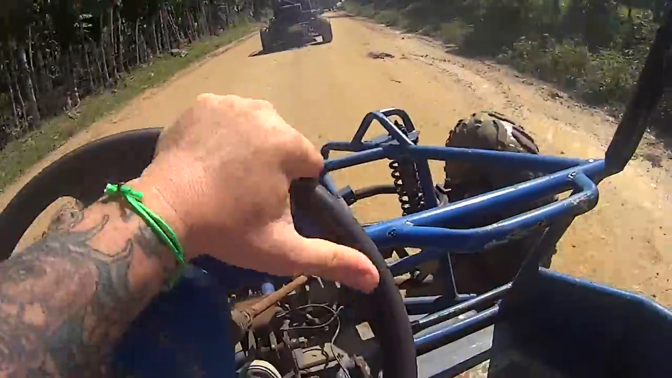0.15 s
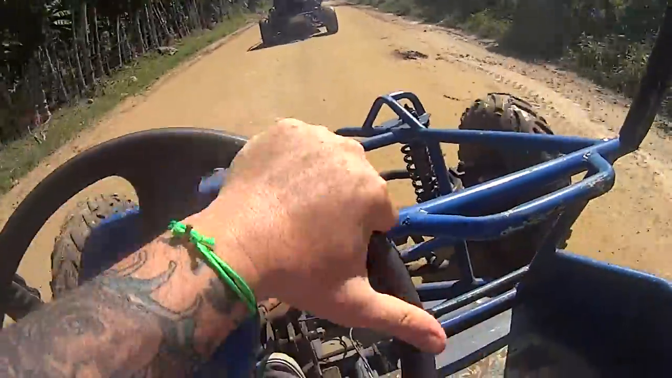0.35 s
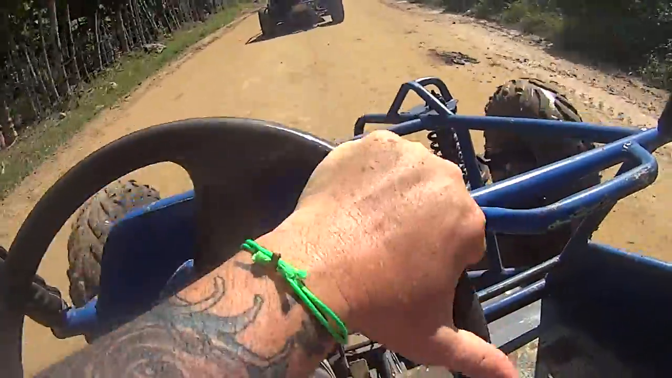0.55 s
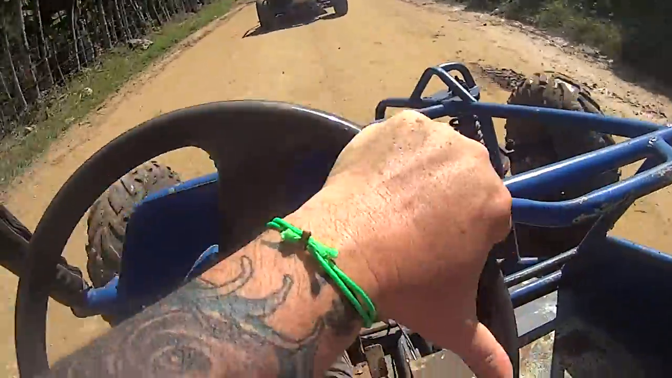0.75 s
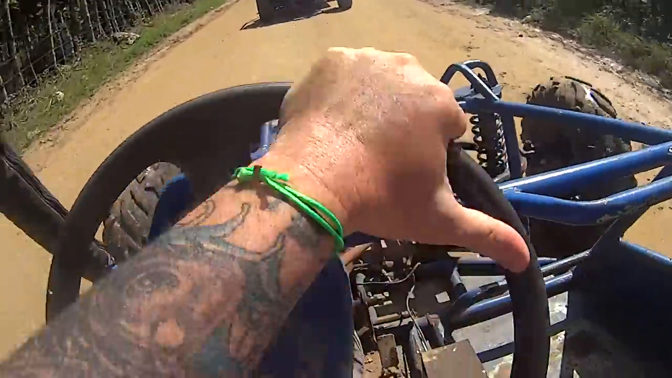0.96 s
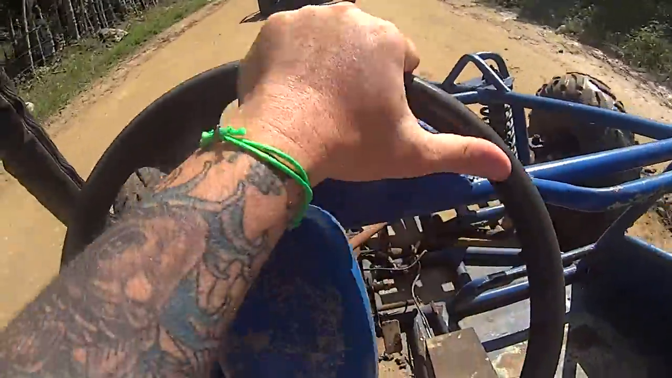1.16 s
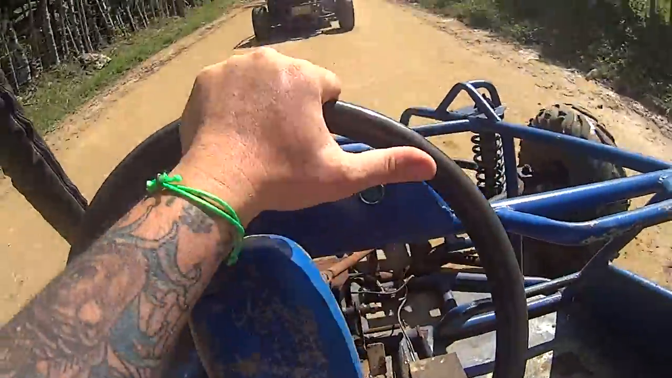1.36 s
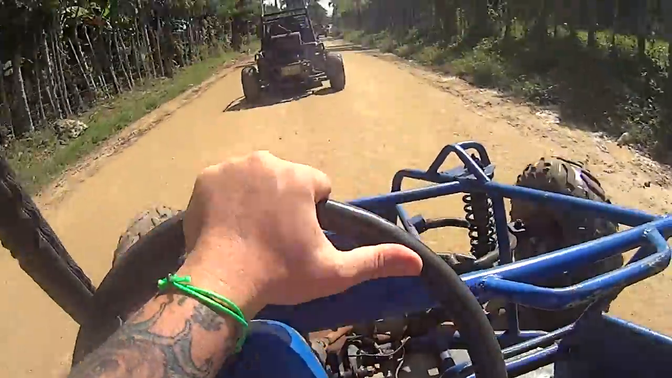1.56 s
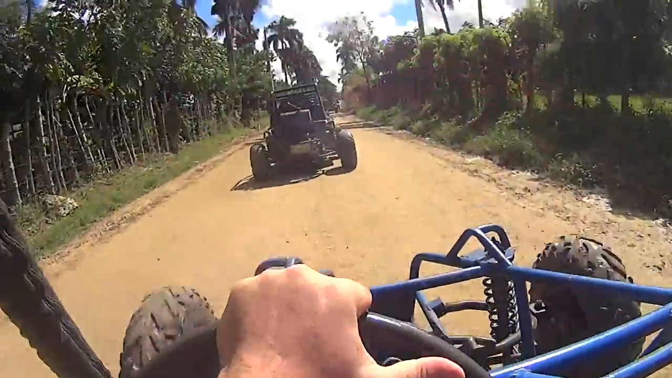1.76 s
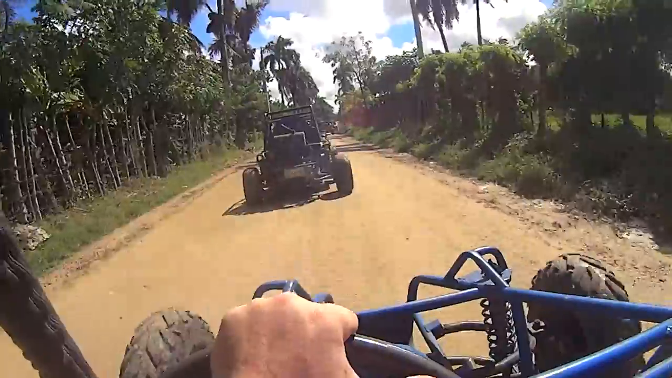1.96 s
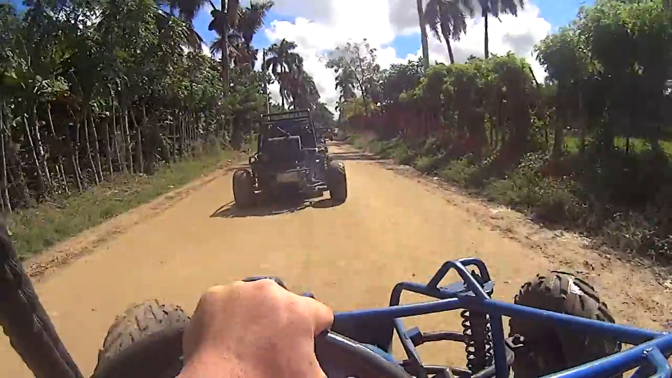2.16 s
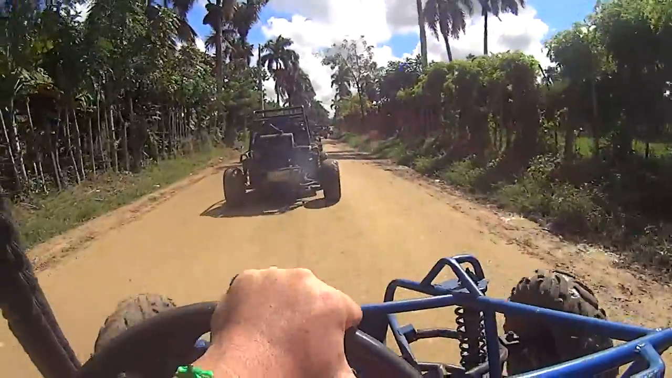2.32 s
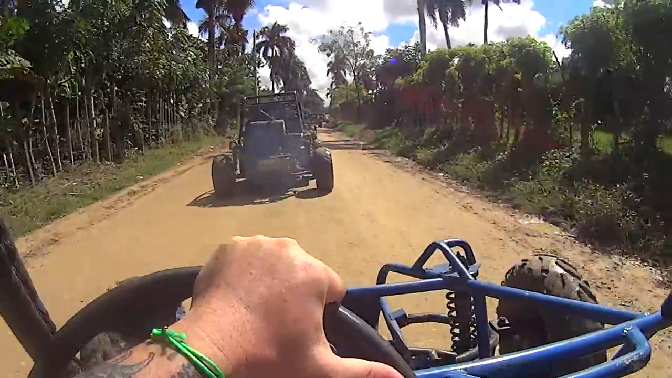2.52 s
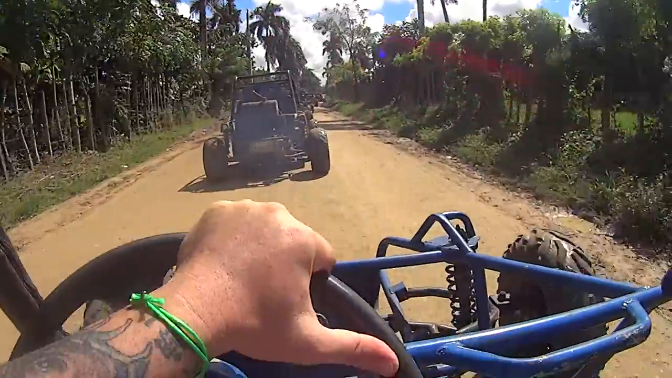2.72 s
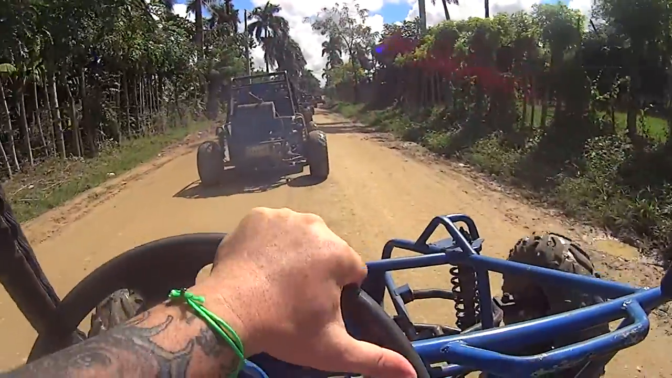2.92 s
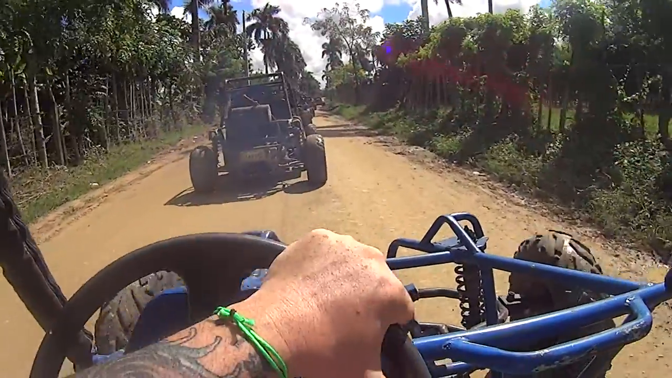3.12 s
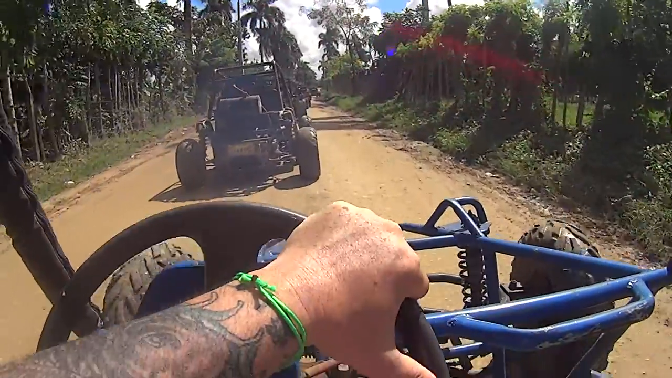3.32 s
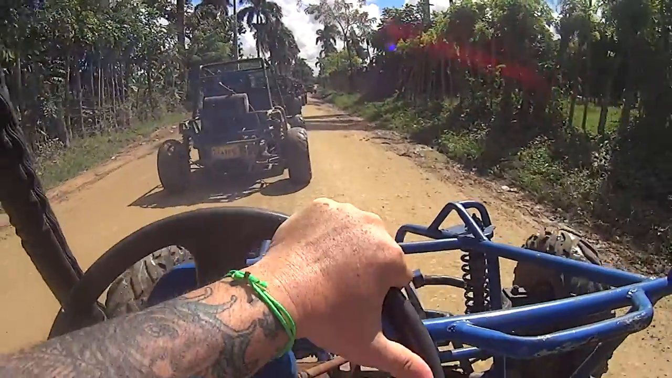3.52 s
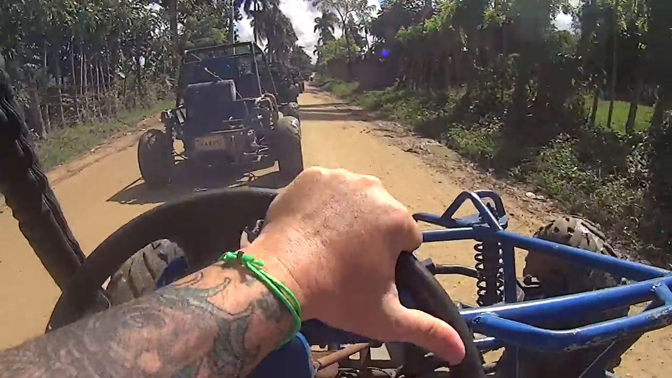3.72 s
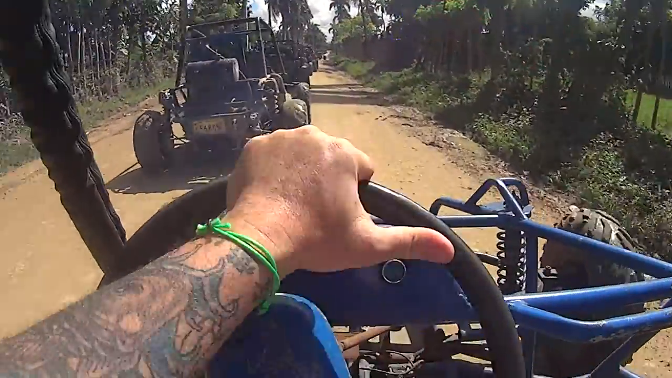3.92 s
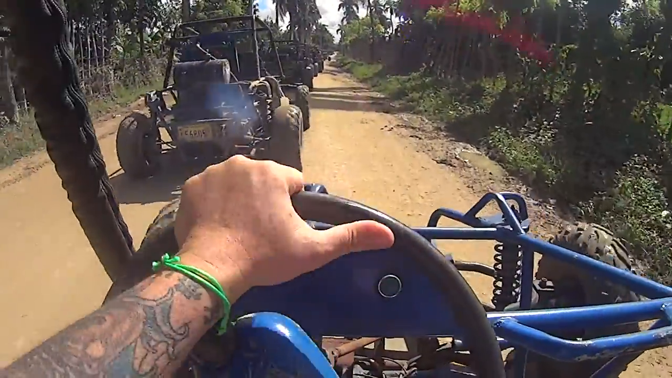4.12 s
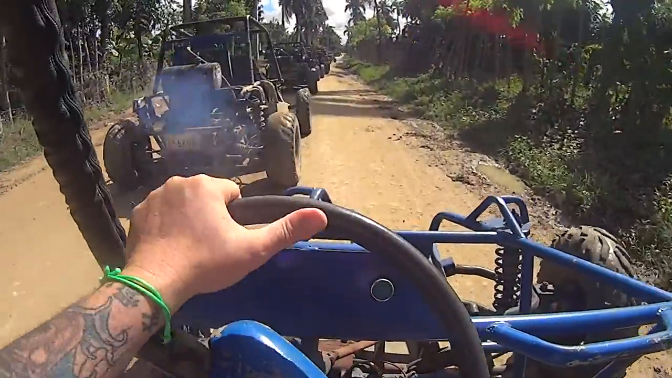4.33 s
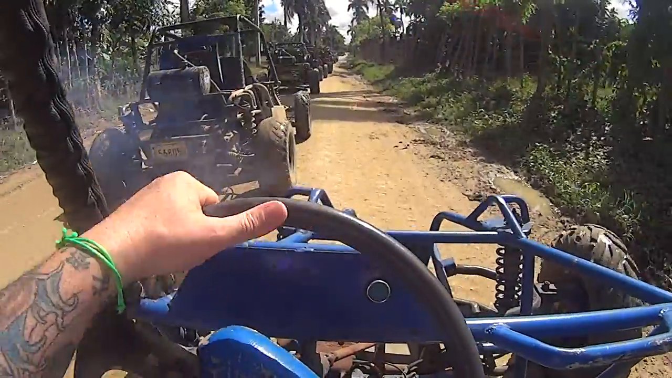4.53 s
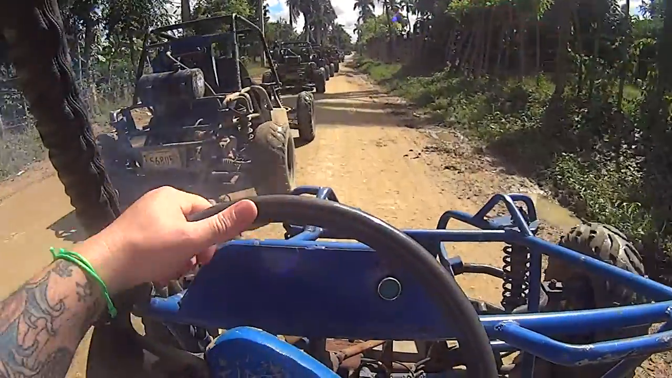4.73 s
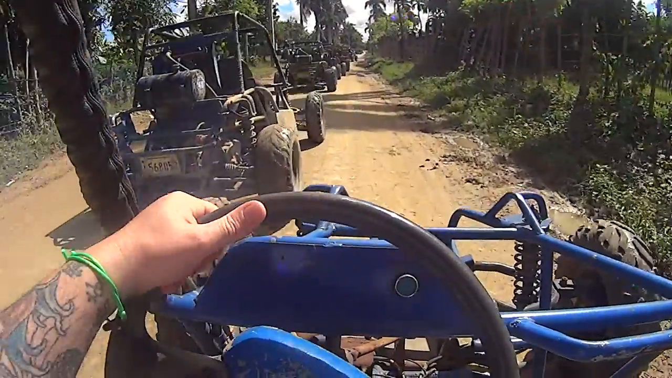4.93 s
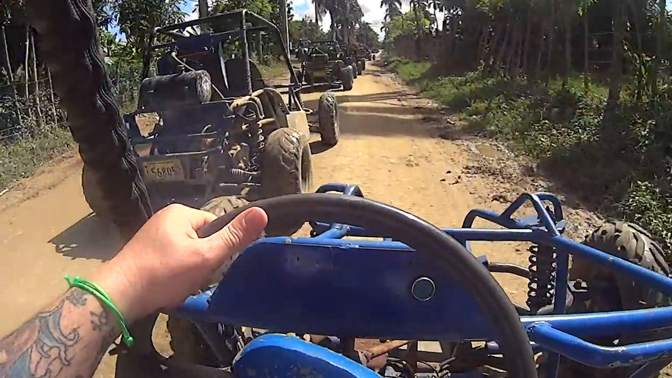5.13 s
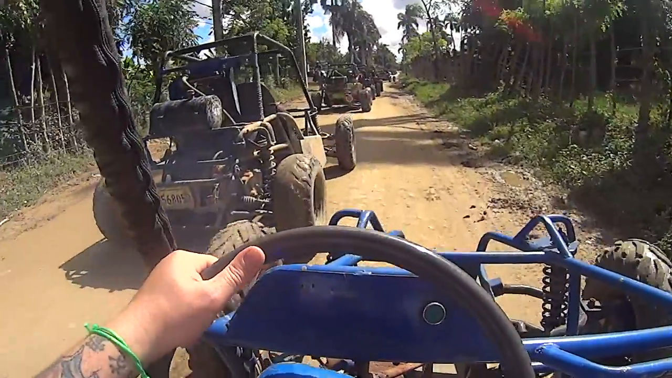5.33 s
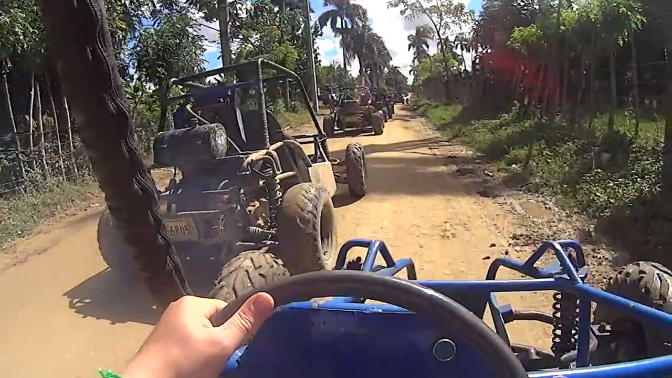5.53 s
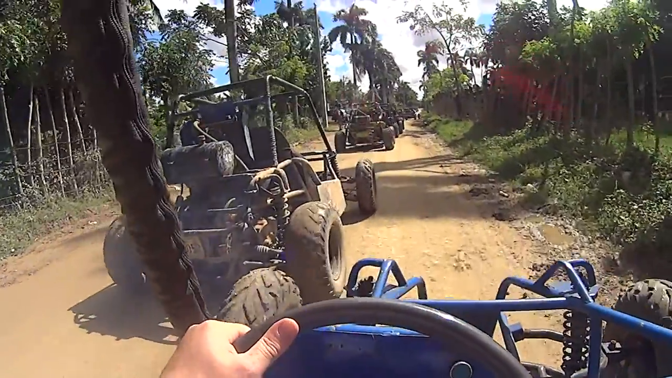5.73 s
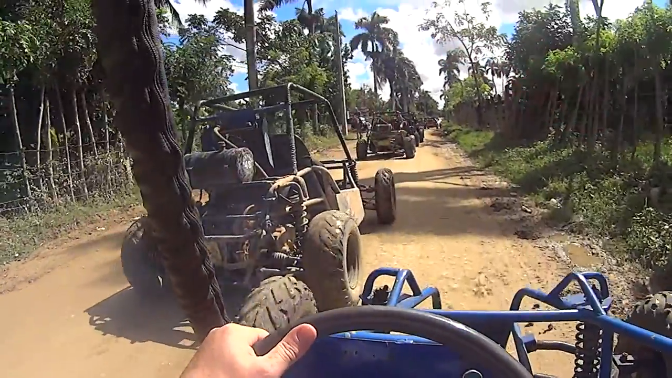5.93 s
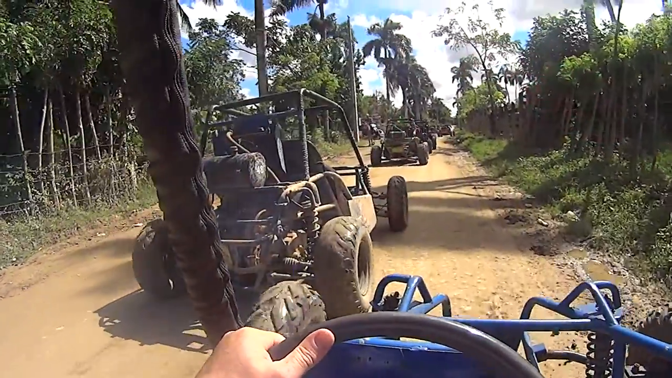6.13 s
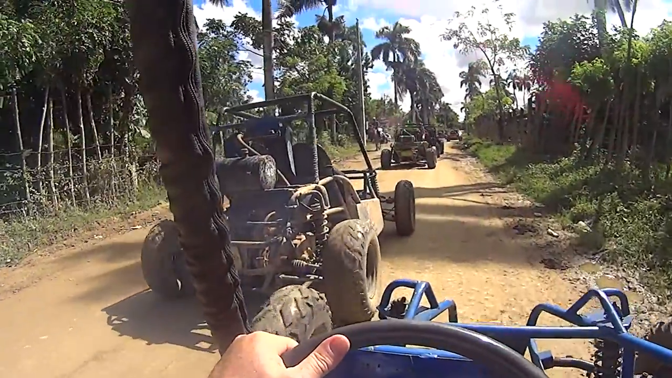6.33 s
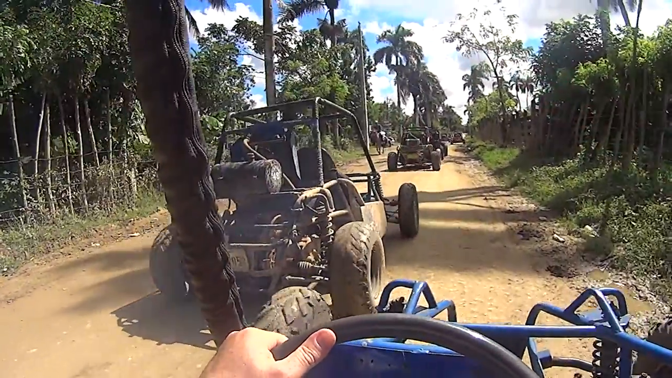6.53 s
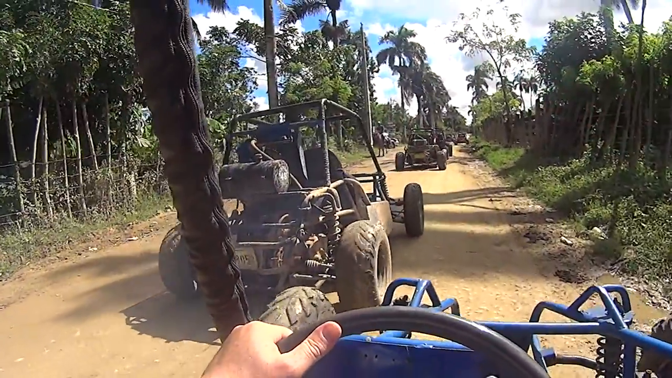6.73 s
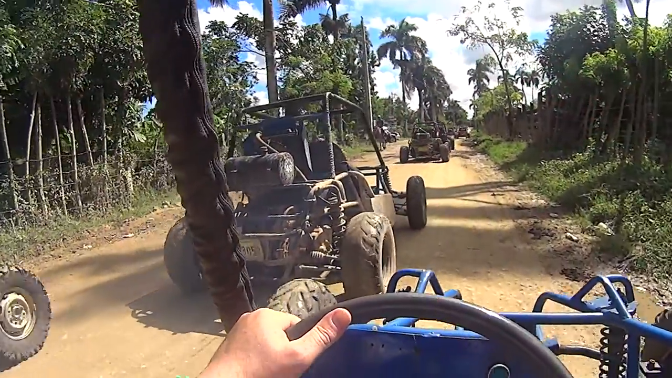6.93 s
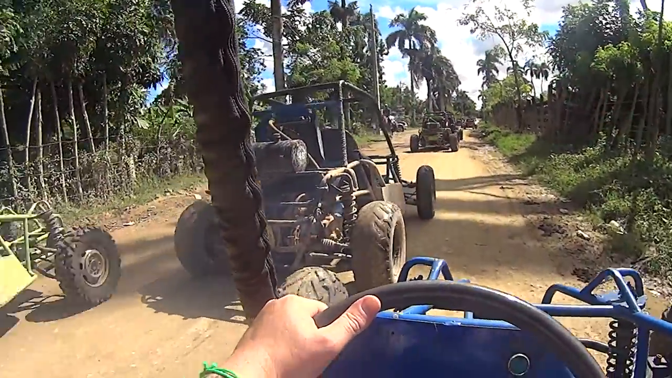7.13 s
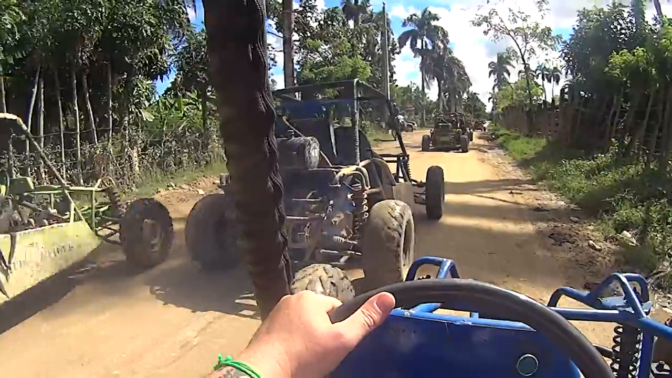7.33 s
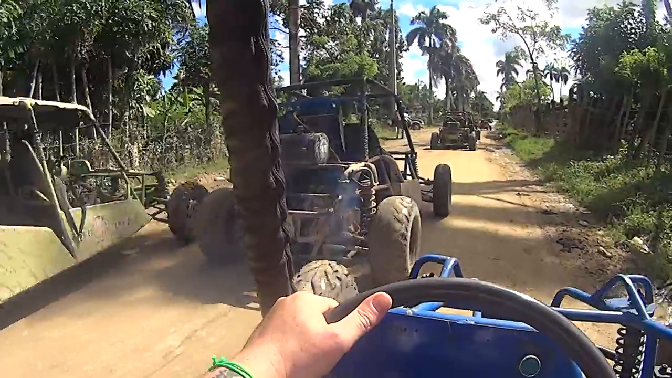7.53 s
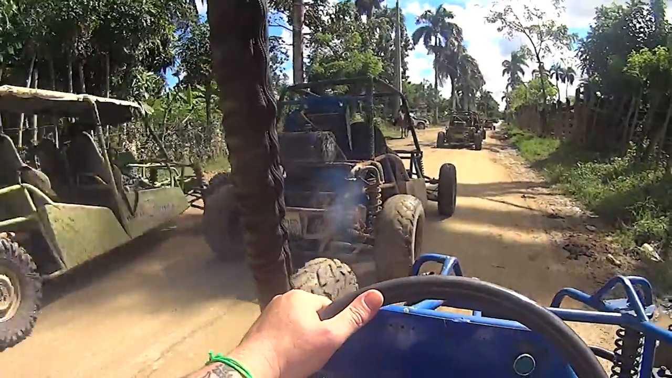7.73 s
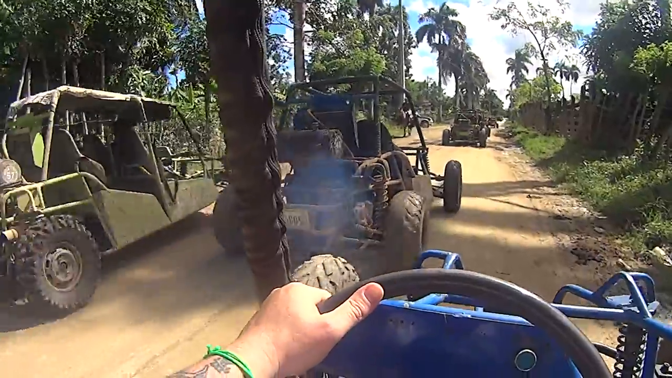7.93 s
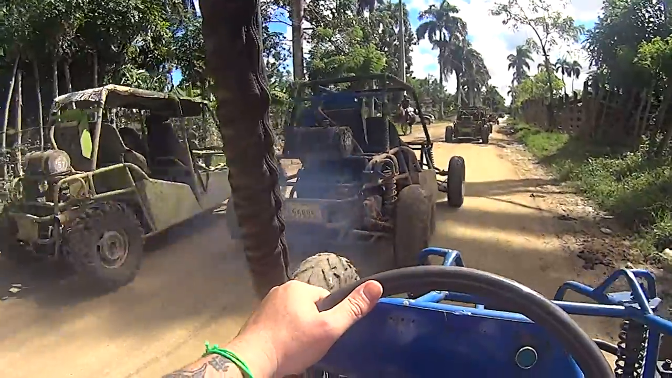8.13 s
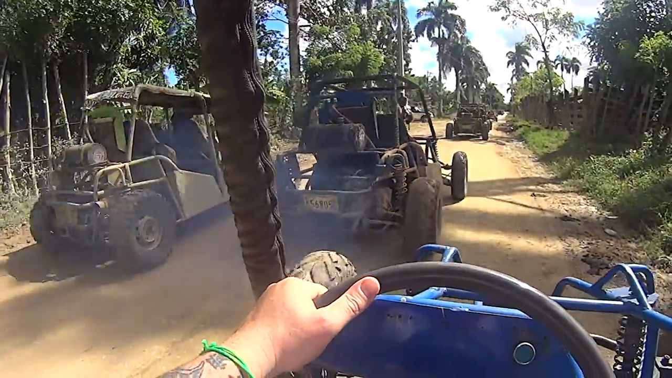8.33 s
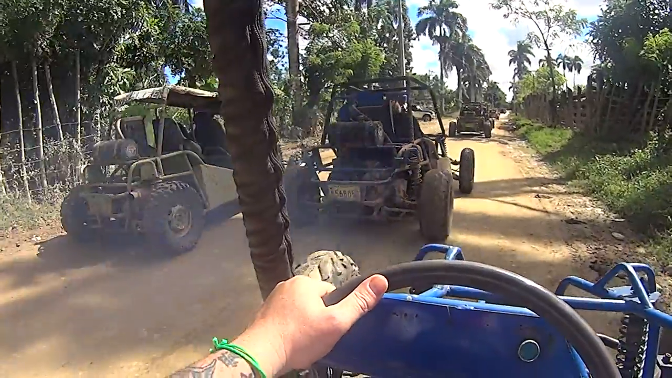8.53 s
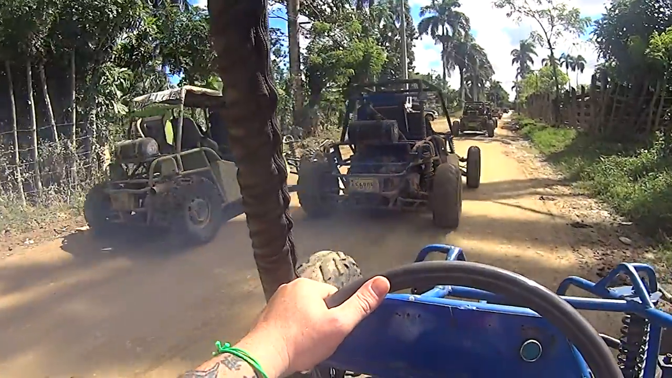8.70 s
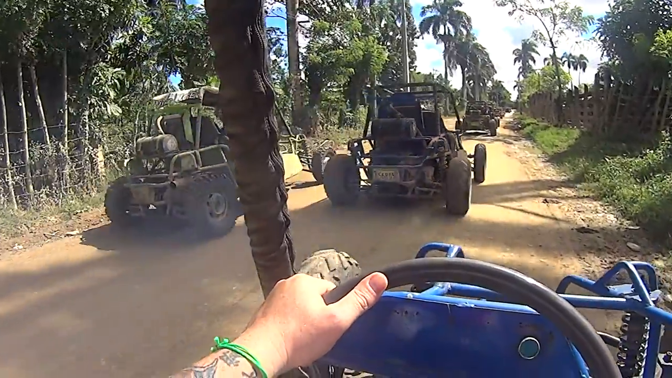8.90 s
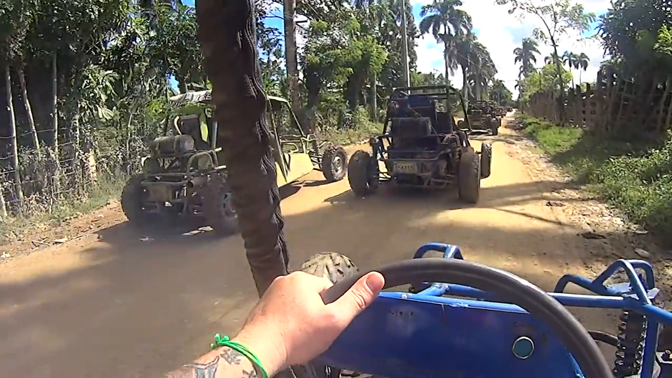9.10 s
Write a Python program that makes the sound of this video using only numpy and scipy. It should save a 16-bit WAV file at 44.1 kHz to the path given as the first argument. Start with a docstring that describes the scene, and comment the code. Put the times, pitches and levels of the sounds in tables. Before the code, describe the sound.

From the driver's seat of a dune buggy on a dirt track, the engine chugs at idle, then revs twice with a booming, raspy exhaust and sharp pops. It coasts down, revs hard twice more with a metallic buzz, and sinks to a quieter, uneven idle. Near the end, the buggy ahead pulls away, its engine rising in pitch amid a run of exhaust cracks.

```python
"""Dirt track, driver's seat of a dune buggy: each throttle press revs the engine, which then coasts down.
Firings boom in the silencer and sound the pipe; their blast barks, buzzes a heat shield and rings the
camera's plastic housing. A second buggy blips its throttle; the buggy ahead pulls away.
The frame rattles, the drive whines faintly, and a limiter holds down the loudest peaks."""
import sys
import numpy as np
from scipy import signal
from scipy.fft import rfft, irfft, next_fast_len
from scipy.io import wavfile
from scipy.ndimage import uniform_filter1d, minimum_filter1d, map_coordinates

SR = 44100
rng = np.random.default_rng(int(sys.argv[2]) if len(sys.argv) > 2 else 0)


def dump_mix(stems):
    """Bounce the given channels to the path in sys.argv[1] as a 16-bit WAV at rate SR."""
    frames = np.atleast_2d(stems).T  # one column per channel
    limited = np.clip(frames, -1, 1)  # hard clip at full scale
    pcm = np.round(limited * 32767).astype(np.int16)
    wavfile.write(sys.argv[1], SR, pcm)


N = 403956

IDLE_HZ, CLUTCH_HZ, CRUISE_HZ = 42.44, 70.07, 116.6  # firing rates
# Throttle presses: down/s, up/s, opening time/s, top firing rate/Hz, bow of climb (0 = straight),
# pipe boost/dB, bark/dB, ring/dB, rasp/dB, shield/dB, tick re rasp/dB,
# drone share, turbulent share, singing share of ring. Levels in all tables are relative.
PRESSES = [(1.106, 1.763, .08, 113, 0.39, 8.8, -28, -13.5, -30, -51.5, -20.5, 0.084, 0.075, 0.35),
           (1.999, 2.42, 0.038, 134.8, 0.21, 7, -31.5, -14, -29, -51, -16, 0.23, 0.25, 0.041),
           (3.98, 4.52, 0.14, 106.2, 0.29, 4.9, -23, -14, -26.5, -29.5, -7, 0.12, 0.11, 0.036),
           (4.74, 4.802, 0.027, 87.7, 0.016, 1.4, -27.5, -13, -33.5, -42, -16, 0.073, 0.64, 0.052),
           (4.86, 5.657, 0.027, 135.1, -.17, 1.48, -28.5, -14.5, -33, -57, -3, 0.15, 0.16, 0.38)]
# Bass, common to boom and pipe: t/s, level/dB
BASS = [(0, -38.5), (.55, -37.5), (1.98, -37.5), (2.2, -41.5), (2.8, -44), (3.15, -40.5), (3.55, -42),
        (4.1, -38.5), (5.15, -38), (5.45, -47), (6.6, -52), (7.6, -52), (8, -46)]
# Blast, throttle shut: t/s, level/dB
SHUT_BLAST = [(0, -49), (1, -45), (1.9, -42.5), (2.55, -40.5), (2.9, -47), (3.3, -42.5), (3.6, -50),
              (4, -42.5), (4.65, -38.5), (5.72, -42), (6.08, -47.5), (6.45, -48.5), (7.3, -54), (7.7, -52)]
# Bark, throttle shut: t/s, level/dB
SHUT_BARK = [(0, -45), (1, -46.5), (2.5, -42.5), (2.9, -51), (3.3, -41), (3.7, -48.5), (4.65, -40),
             (5.75, -39.5), (6.15, -48.5), (7.3, -58), (7.7, -53.5)]
# Heat shield, throttle shut: t/s, level/dB
SHUT_SHIELD = [(0, -64), (1.9, -51), (2.45, -44.5), (3.3, -50), (3.9, -57), (4.6, -47), (5.7, -60),
               (7.3, -68)]


def engine(tuned_hz=80.8, tuned_width_hz=17, tuned_peak_db=5):
    """Own engine: louder and cleaner with the throttle open, chugging unevenly with it shut."""
    rate, opened = firing_rate(), throttle_openings()
    throttle = np.minimum(opened.sum(0), 1)
    shut = 1 - throttle
    settings = np.transpose(PRESSES)[5:] @ opened
    boost_db, bark_db, ring_db, rasp_db, shield_db, tick_db, drone, rough, singing = settings
    bass_db, = curves(BASS)
    tuned_db = tuned_peak_db * np.exp(-((rate - tuned_hz) / tuned_width_hz) ** 2)  # pipe resonance
    pipe_db = bass_db + boost_db + throttle * tuned_db - .5 * shut
    rough = np.clip(rough + shut * np.interp(rate, [IDLE_HZ, CRUISE_HZ], [.95, .45]), .01, .99)
    drone = np.clip(drone + .049 * shut, 0, .8)
    idling = shut * np.interp(rate, [IDLE_HZ, CLUTCH_HZ], [1, 0])
    chug = -idling * np.cos(2 * np.pi * np.cumsum(rate / 3) / SR)  # one swell per engine cycle
    low = exhaust(rate, shut, chug, rough, drone, bass_db, pipe_db)

    pulsed = .89 * throttle + shut * np.interp(rate, [IDLE_HZ, CRUISE_HZ], [.22, .6])
    singing = np.clip(singing + .18 * shut, 0, 1)
    overrun_db = curves(SHUT_BLAST)[0] + .9 * wobble(14)  # uneven burning
    rev_octaves = throttle * np.log2(rate / CRUISE_HZ)
    bark_db += 10 * rev_octaves + throttle * .55 * (bass_db + 41) + shut * curves(SHUT_BARK)[0]
    ring_db += 4 * rev_octaves + shut * (overrun_db + 18.5) + .5 * chug
    rasp_db += 4 * rev_octaves + shut * (overrun_db - .86)
    shield_db += shut * curves(SHUT_SHIELD)[0] + 3.5 * wobble(36.46)  # buzzes in fits
    return low + rasp(rate, pulsed, singing, bark_db, ring_db, rasp_db, shield_db, tick_db)


def firing_rate(coast_hz_per_s=63, free_hz_per_s=130):
    """Rate/Hz: climbs on each press, coasts until the clutch lets go, drops to a wandering idle."""
    t = np.arange(N) / SR
    idle = IDLE_HZ * (1 + .035 * wobble(5))
    rate = idle
    for down, up, _, top, bow, *_ in PRESSES:
        start = rate[int(down * SR)]
        progress = np.clip((t - down) / (up - down), 0, 1)
        climb = start + (top - start) * (progress + bow * progress * (1 - progress))
        coast = top - coast_hz_per_s * (t - up)
        free = CLUTCH_HZ - (CLUTCH_HZ - coast) * free_hz_per_s / coast_hz_per_s
        fall = np.maximum(np.minimum(coast, free), idle)
        rate = np.select([t < down, t < up], [rate, climb], fall)
    return rate


def throttle_openings(close_s=.038):
    """Opening (0-1), one row per press: ramps open, springs shut."""
    t = np.arange(N) / SR
    return np.array([np.clip(np.minimum((t - down) / open_s, 1 - (t - up) / close_s), 0, 1)
                     for down, up, open_s, *_ in PRESSES])


# Header travel time per cylinder: delay/s
HEADER_S = [0.00025, 0.00055, 0]


def firings(rate, scatter_db, jitter, limp_db):
    """One impulse per firing; of three cylinders one is strong, one weak. Less even at low revs."""
    at = np.flatnonzero(np.diff(np.floor(np.cumsum(rate) / SR + .9)))
    chance = rng.standard_normal((len(at), 2))
    uneven = np.sqrt(70 / rate[at])
    cylinder_db = np.resize([1, 0, -1], len(at)) * np.broadcast_to(limp_db, N)[at]
    delay_s = np.resize(HEADER_S, len(at)) + jitter / rate[at] * uneven * chance[:, 0]
    arrival = np.clip(at + delay_s * SR, 0, N - 1).astype(int)
    return np.bincount(arrival, amp(uneven * (scatter_db * chance[:, 1] + cylinder_db)), N)


# Silencer, pipe and rumble spectra: f/Hz, level/dB
BOOM = [(25, -37), (48, -36), (64, -14.5), (80, -1), (125, -13.5), (160, -19), (260, -29.5), (500, -87.5)]
PIPE = [(60, -56), (120, -12), (165, 1), (250, -4), (330, 4), (410, 4), (500, -7), (640, -10.5),
        (900, -36.5), (1500, -65)]
RUMBLE = [(25, -27), (55, -10.5), (90, -13.5), (180, 2), (320, 4), (420, -7), (520, -9), (750, -15),
          (1200, -31), (2500, -87)]


def exhaust(rate, shut, chug, rough, drone_share, boom_db, pipe_db):
    """Firings boom in the silencer and sound the pipe; off throttle they break up into rumble."""
    pulses = firings(rate, scatter_db=.8, jitter=.003, limp_db=1.2 + 4 * shut)
    boom_pulses = firings(rate, scatter_db=0, jitter=.006, limp_db=1.5)
    boom = steady(voice(boom_pulses, BOOM) + 1.2 * np.sqrt(rough) * voice(noise(), BOOM))
    ragged = firings(rate, scatter_db=1, jitter=.032, limp_db=-1)
    rumble, rumble_side = [voice(puffs(ragged, decay_s=.04) * amp(3.5 * chug), RUMBLE) for _ in range(2)]
    pipe = blend(voice(pulses, PIPE), rumble, rough)
    cycles = np.cumsum(rate) / SR + .9 - np.mean(HEADER_S) * rate
    drone = np.sqrt(2) * np.sin(2 * np.pi * 3 * cycles + .2 * wobble(25))  # third harmonic
    pipe = blend(pipe, drone, drone_share)
    diffuse = amp(pipe_db - 8) * np.sqrt(rough) * rumble_side + amp(boom_db - 14) * voice(noise(), BOOM)
    return low_pair(amp(boom_db) * boom + amp(pipe_db + 1.5) * pipe) + pair(0, diffuse)


def blast(pulses, pulsed, crack, decay_s):
    """Gas leaving the pipe: a crack and puff per firing as the pulsed share, the rest a fluttering rush."""
    rush = noise() * amp(wobble(70))
    return blend(rush, steady(crack * pulses + puffs(pulses, decay_s)), pulsed)


# Bark, mid rasp and side rasp spectra: f/Hz, level/dB
BARK = [(400, -41.5), (620, -9.5), (740, -1), (820, 4), (910, 4.5), (1000, 5.5), (1130, 4.5), (1200, 7),
        (1260, 7.5), (1340, 9.5), (1700, -52.5)]
RASP = [(1400, -11.5), (2000, 7), (2700, -2), (3700, -9), (4500, -24), (6000, -6.5), (6800, -17.5),
        (8500, -32), (10300, -17), (11300, -40.5), (12000, -48.5)]
RASP_SIDE = [(600, -9), (1200, -5), (1750, 5), (2050, -15), (2350, 9.5), (2600, 4), (2900, 8), (3400, 3.5),
             (3750, -1.5), (4200, -4), (5500, -9.5), (6400, -19), (7500, -17), (10300, -21), (11800, -75)]
# Tailpipe and tick resonances: f/Hz, width/Hz, level/dB
TAILPIPE_MODES = [(915, 52, 4)]
TICK_MODES = [(5250, 374, 0.5), (6560, 300, -26), (7840, 190, -8.5), (9500, 510, -19.5)]
# Housing resonances (main, upper, singing, lowest): f/Hz, width/Hz, level/dB
HOUSING_MODES = [(1550.5, 72, 2.5), (1646.4, 37.4, 2.5), (1765, 88, -4.5), (1980, 140, -17.5),
                 (2339, 89, -21)]
UPPER_MODES = [(2367, 48, 8), (3356, 460, -0.5), (4200, 380, -4), (5220, 350, 3), (7670, 740, -9),
               (9130, 480, -12)]
SINGING_MODE = [(1590, 58, 0)]
LOW_MODE = [(1485, 50, 0)]
# Pitch sag of the ring before the first rev: t/s, share of LOW_MODE
RING_SAG = [(.55, 0), (.8, .5), (1.08, .6), (1.15, 0)]


def rasp(rate, pulsed, singing, bark_db, ring_db, rasp_db, shield_db, tick_db):
    """The exhaust blast barks, rings the housing walls and buzzes a heat shield."""
    pulses = firings(rate, scatter_db=1.6, jitter=.004, limp_db=1.6)
    bark = voice(blast(pulses, pulsed, crack=1.9, decay_s=.005), BARK, TAILPIPE_MODES)
    strike = blast(pulses, pulsed, crack=1.7, decay_s=.0035)
    sag, = curves(RING_SAG)
    shares = [((1 - singing) * (1 - sag), HOUSING_MODES), (singing, SINGING_MODE), (sag, LOW_MODE)]
    ring = steady(sum(share * voice(strike, modes=modes) for share, modes in shares))
    push_db = .5 * np.maximum(ring_db + 22, 0)  # full throttle drives the ring hardest
    hiss = blast(pulses, .82 * pulsed, crack=.25, decay_s=.0033)
    mid = voice(hiss, RASP, UPPER_MODES)
    # rocking walls drive left and right in opposition
    rocking = blast(pulses, .85 * pulsed, crack=.3, decay_s=.0022)
    side = voice(hiss + .57 * rocking, RASP_SIDE)
    shield = amp(shield_db) * voice(hiss, modes=[(3305, 222, 0), (3447, 99, 0)])
    tick_gate = np.clip((rasp_db + 42) / 8, 0, 1)  # firings tick when the rasp is loud
    tick = amp(rasp_db + tick_db) * tick_gate * voice(puffs(pulses, decay_s=.0012), modes=TICK_MODES)
    body = tick + shield + amp(bark_db - .5) * bark + amp(ring_db + push_db) * ring
    return pair(body + amp(rasp_db + 2) * mid, amp(rasp_db + 7.5) * side)


# Exhaust pops: t/s, level/dB
POPS = [(1.068, -8), (1.145, 3), (1.152, -13), (1.208, 0), (1.305, -4.5), (1.388, 1.5), (2.025, -3.5),
        (2.507, -10), (3.116, -17), (3.257, -9), (4.758, -7), (4.867, -4), (7.763, -5), (7.795, -10),
        (7.845, -10), (7.912, -6), (7.954, 0.5), (8.028, 0), (8.061, -10), (8.143, -12), (8.177, -1),
        (8.223, -9.5), (8.452, 0), (8.673, -1), (8.716, 3), (9.013, -3.5)]


def pops():
    """Single hard firings strike the housing."""
    impulses = blows(POPS)
    burst = impulses + .35 * puffs(impulses, decay_s=.003)
    ring = amp(31) * colour(burst, modes=HOUSING_MODES)
    return ring + amp(2) * colour(puffs(impulses, decay_s=.008), RASP, UPPER_MODES)


# Revs of the buggy ahead: t/s, firing rate/Hz
AHEAD_RATE = [(7.73, 30), (7.85, 42.5), (8.04, 58), (8.15, 61.5), (8.35, 66.5), (8.6, 68.5), (8.8, 70.3),
              (9, 72.5), (9.16, 75)]
# Its pipe, bark, ring and rasp: level/dB, slope/(dB per octave of firing rate)
AHEAD_LEVELS = [(-33, 21), (-33.5, 13), (-16.5, 5), (-30, 2)]
# Its pipe spectrum: f/Hz, level/dB
AHEAD_PIPE = [(55, -52.5), (75, -3.5), (135, 1.5), (210, 0.5), (280, -2.5), (360, 4.5), (440, 1.5),
              (510, -0.5), (580, -28), (660, -28), (770, -9.5), (900, -15), (1500, -56)]
# Housing resonances, struck from the front (main, upper): f/Hz, width/Hz, level/dB
FRONT_MODES = [(1564, 75, 6), (1680, 111, 2.5), (1870, 94, -4), (1870, 140, -25), (2352, 49, -12)]
FRONT_UPPER_MODES = [(2320, 66, -12), (3310, 560, 1.5), (4070, 175, 3), (5216, 450, 9), (7660, 820, -3),
                     (9350, 820, -7)]


def buggy_ahead(start_s=7.733, open_s=.14, cruise_hz=71.7):
    """The buggy ahead sets off, tailpipe aimed this way: each firing is a distinct crack."""
    rate, = curves(AHEAD_RATE)
    pipe_db, bark_db, ring_db, rasp_db = [db + slope * np.log2(rate / cruise_hz)
                                          for db, slope in AHEAD_LEVELS]
    throttle = np.clip((np.arange(N) / SR - start_s) / open_s, 0, 1)
    rate = rate * (throttle > 0)
    even = firings(rate, scatter_db=.7, jitter=.0025, limp_db=1.3)
    pipe = amp(pipe_db) * voice(even + .1 * puffs(even, decay_s=.023), AHEAD_PIPE)
    bark = amp(bark_db) * voice(even + .5 * puffs(even, decay_s=.009), BARK)
    ragged = firings(rate, scatter_db=1.7, jitter=.007, limp_db=2)
    ring = amp(ring_db) * voice(blast(ragged, .84, crack=.7, decay_s=.006), modes=FRONT_MODES)
    hiss = blast(ragged, .82, crack=.2, decay_s=.0028)
    mid = amp(rasp_db) * voice(hiss, RASP, FRONT_UPPER_MODES)
    rocking = blast(ragged, .88, crack=.1, decay_s=.004)
    side = amp(rasp_db + 5) * voice(hiss + .87 * rocking, RASP_SIDE)
    return throttle * (low_pair(pipe) + pair(bark + ring + throttle * mid, throttle * side))


# Throttle blip: t/s, firing rate/Hz, level/dB
BLIP = [(3, 44, -86.5), (3.12, 45, -40.5), (3.22, 58, -33), (3.35, 62, -35.5), (3.45, 50, -51.5),
        (3.6, 43, -73.5)]


def second_buggy():
    """A second buggy blips its throttle; only its pipe carries."""
    rate, db = curves(BLIP)
    pulses = firings(rate, scatter_db=1, jitter=.006, limp_db=1)
    pipe_spectrum = [(50, -39), (115, 3.5), (240, 0), (330, -3), (600, -20), (1500, -64.5)]
    return amp(db) * voice(pulses, pipe_spectrum)


# Frame rattles: t/s, level/dB
RATTLES = [(0.4183, -41), (0.4737, -43), (0.5465, -39.5), (0.857, -44.5)]


def frame_rattles():
    """Loose frame parts tick over bumps."""
    spectrum = [(1500, -42), (3500, 17), (9000, 1), (11500, -11.5)]
    return amp(19.5) * colour(puffs(blows(RATTLES), decay_s=.004), spectrum)


# Drive whines, one list per tone: t/s, f/Hz, level/dB; the third list is a hum of the coasting engine
WHINES = [
    [(-.05, 1255, -37.5), (.6, 1255, -50), (1.15, 1255, -42)],
    [(.4, 600, -54), (.7, 533, -43), (1.05, 455, -55.5)],
    [(2.4, 361.6, -36), (2.6, 329, -34.5), (2.95, 278, -53)],
    [(2.5, 531.3, -53.5), (2.8, 539.2, -52.5), (3.1, 544.7, -53)],
    [(3.48, 589.6, -60), (3.7, 544.7, -48), (3.9, 519, -46), (4.2, 534.7, -50)],
]


def drive_whines(fade_s=.027):
    """Faint, wavering tones of the drive, and one hum of the coasting engine."""
    t = np.arange(N) / SR
    total = np.zeros(N)
    for rows in WHINES:
        hz, db = curves(rows)
        gate = np.clip(np.minimum(t - rows[0][0], rows[-1][0] - t) / fade_s, 0, 1)
        gain = gate * amp(db + 2.5 * wobble(14))
        cycles = np.cumsum(hz * (1 + .012 * wobble(40))) / SR
        total += gain * np.sin(2 * np.pi * cycles)
    return total


def puffs(impulses, decay_s):
    """Each impulse releases a decaying burst of turbulence of equal energy."""
    fade = np.exp(-np.arange(SR // 20) / (decay_s * SR))
    return signal.fftconvolve(impulses, fade / np.linalg.norm(fade))[:N] * noise()


def blows(rows):
    """Impulses from rows of t/s, level/dB."""
    times_s, db = np.transpose(rows)
    return np.bincount((times_s * SR).astype(int), amp(db), N)


def colour(x, spectrum=None, modes=()):
    """Minimum-phase filter: smooth spectrum plus steep-sided resonances."""
    size = 2 * next_fast_len(N // 2 + 8192)
    hz = np.fft.rfftfreq(size, 1 / SR)
    power = np.full(len(hz), 1e-10)
    if spectrum:
        knots_hz, db = np.transpose(spectrum)
        power += amp(np.interp(np.log(hz + 1), np.log(knots_hz), db)) ** 2
    for centre_hz, width_hz, db in modes:
        power += amp(db) ** 2 / (1 + ((hz - centre_hz) / width_hz) ** 2 / 2) ** 4
    cepstrum = irfft(np.log(power))
    cepstrum[0] /= 2
    cepstrum[size // 2:] = 0
    return irfft(rfft(x, size) * np.exp(rfft(cepstrum)), size)[:N]


def steady(x, window_s=.091):
    """x at unit running rms."""
    power = uniform_filter1d(uniform_filter1d(x * x, int(window_s * SR)), int(window_s * SR / 2))
    return x / np.sqrt(np.abs(power) + 1e-14)


def voice(x, spectrum=None, modes=()):
    """x filtered, then held at unit rms."""
    return steady(colour(x, spectrum, modes))


def blend(a, b, share):
    """Equal-power mix; share is b's."""
    return np.sqrt(1 - share) * a + np.sqrt(share) * b


def amp(db):
    """dB to gain."""
    return 10 ** (np.asarray(db) / 20)


def curves(rows):
    """Per-sample curve for each column after t/s."""
    times_s, *columns = np.transpose(rows)
    return [np.interp(np.arange(N) / SR, times_s, column) for column in columns]


def wobble(knot_hz):
    """Smooth random curve."""
    return map_coordinates(rng.standard_normal(int(N * knot_hz / SR) + 4), [np.arange(N) * knot_hz / SR])


def noise():
    """White noise."""
    return rng.standard_normal(N)


def pair(mid, side):
    """Mid/side to left/right."""
    return np.array([mid + side, mid - side])


def low_pair(x, lean=.56, spread=.4):
    """Low sound comes through the mount: stronger on the right, shifted in phase."""
    return pair(x, -lean * x + spread * signal.hilbert(x).imag)


def scene():
    """Own engine, other buggies, running gear."""
    return engine() + pops() + buggy_ahead() + low_pair(second_buggy() + drive_whines()) + frame_rattles()


def record(dry, ceiling=.49, hold_s=.0026, top_hz=11900):
    """Fast limiter, then band limit."""
    gain = np.minimum(1, ceiling / (np.abs(dry).max(0) + 1e-9))
    span = int(hold_s * SR) + 1
    limited = dry * uniform_filter1d(minimum_filter1d(gain, span), span)
    return irfft(rfft(limited) * (np.fft.rfftfreq(N, 1 / SR) < top_hz), N)


dry = scene()
out = record(dry)
dump_mix(out)
```